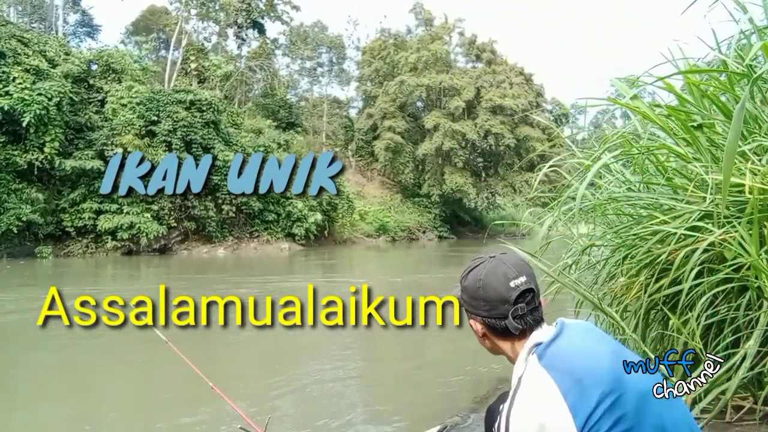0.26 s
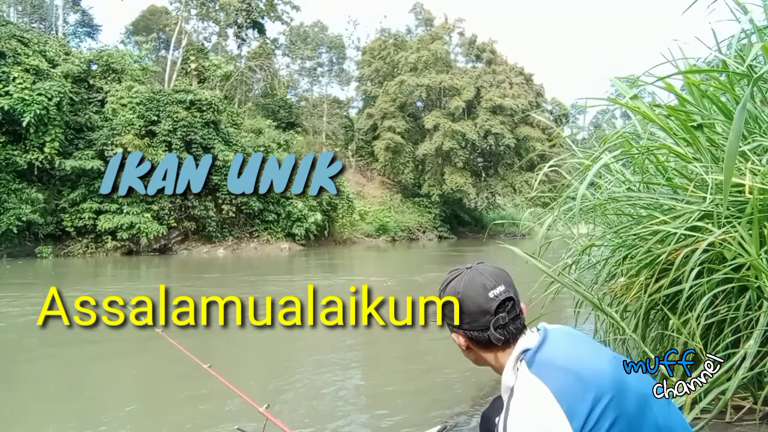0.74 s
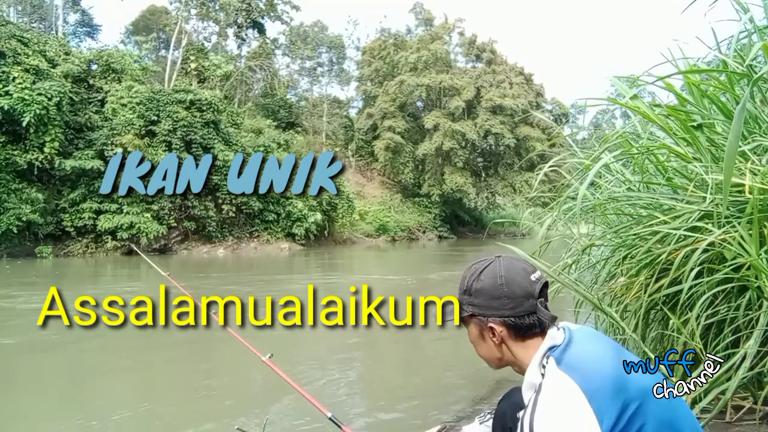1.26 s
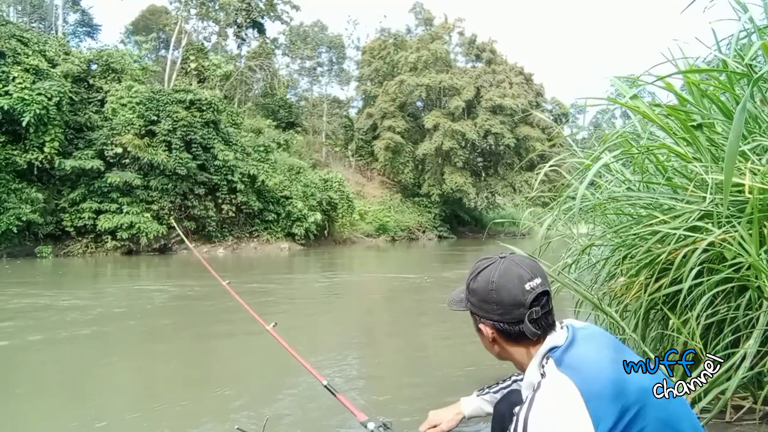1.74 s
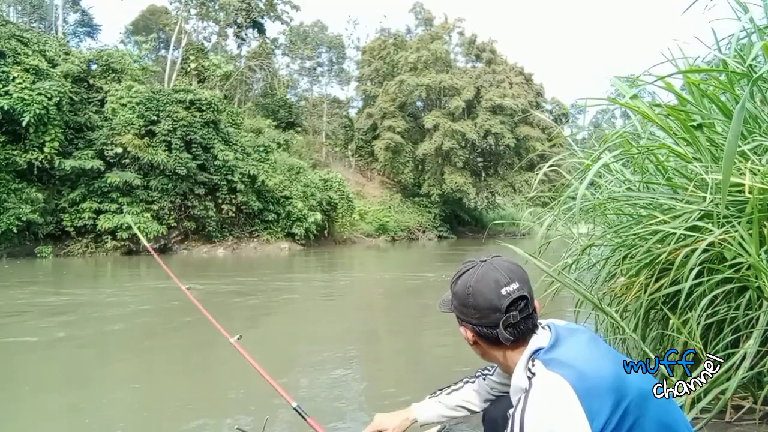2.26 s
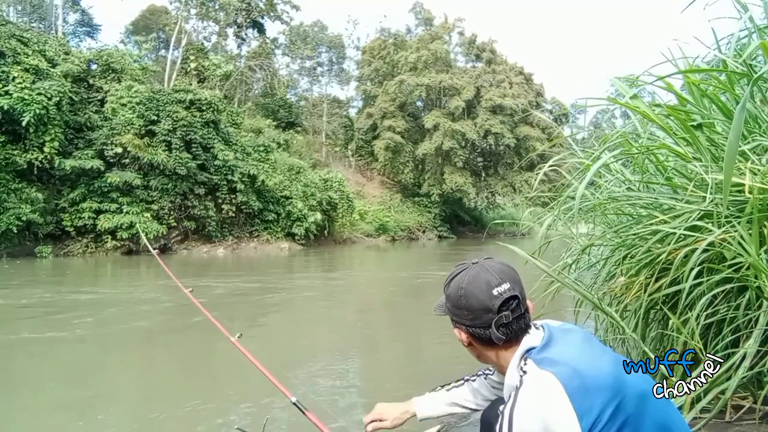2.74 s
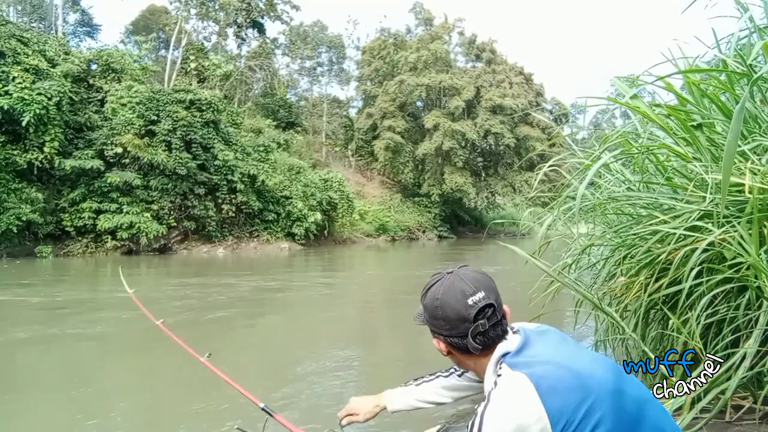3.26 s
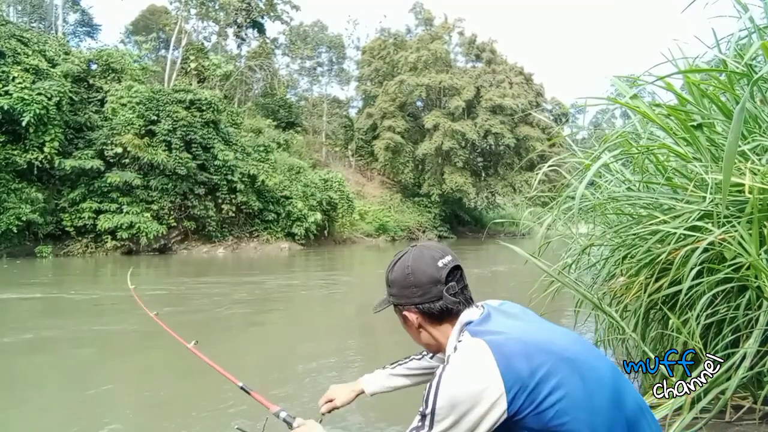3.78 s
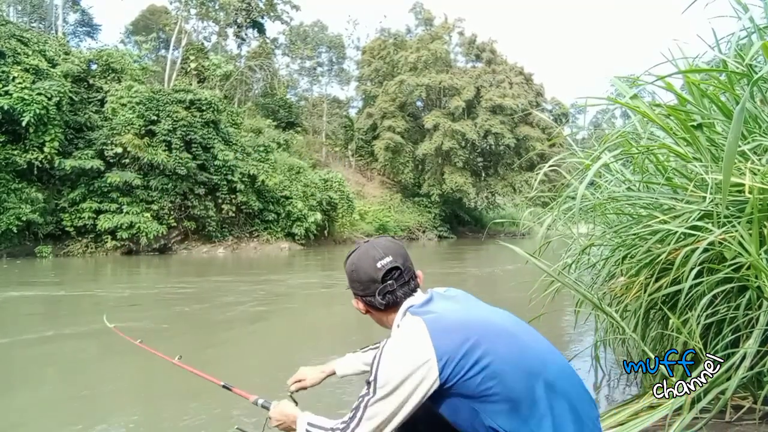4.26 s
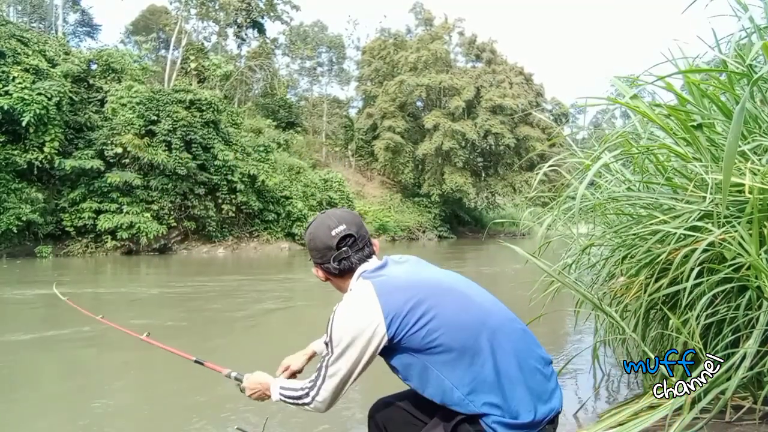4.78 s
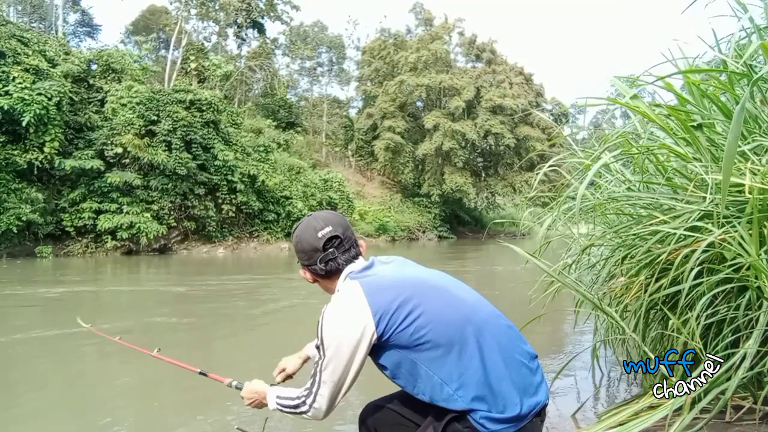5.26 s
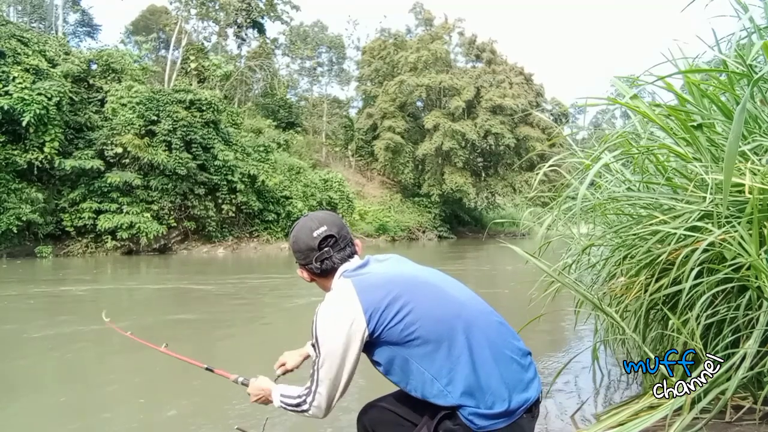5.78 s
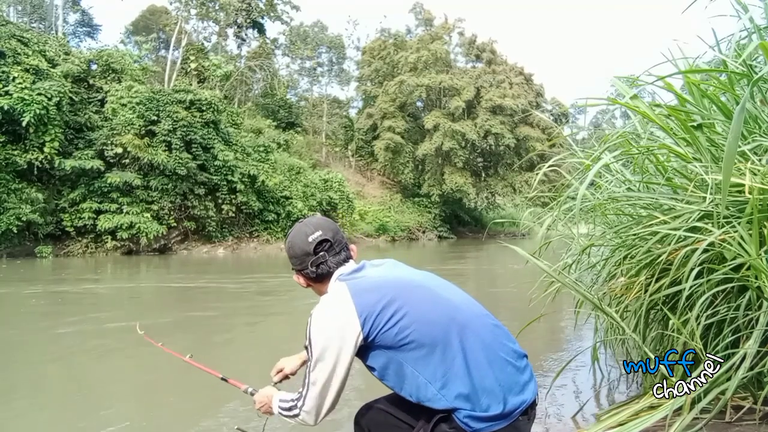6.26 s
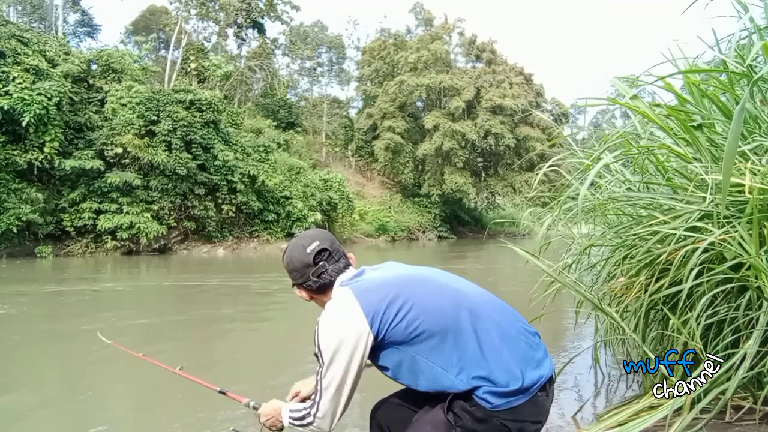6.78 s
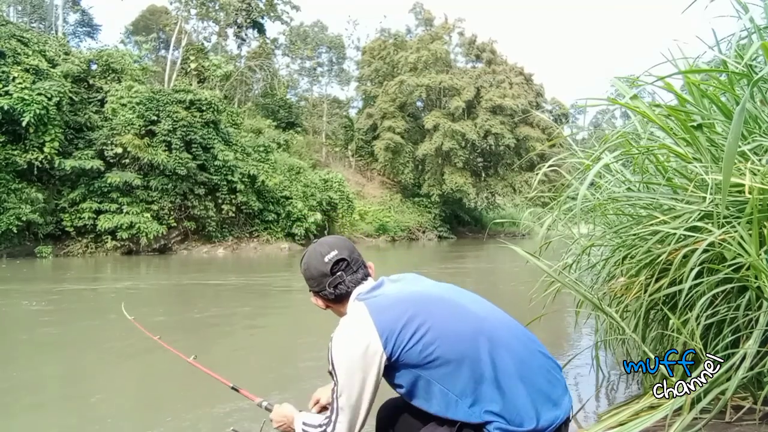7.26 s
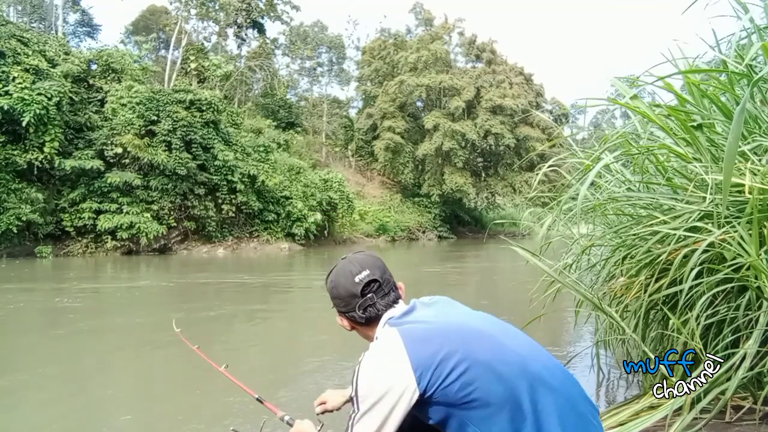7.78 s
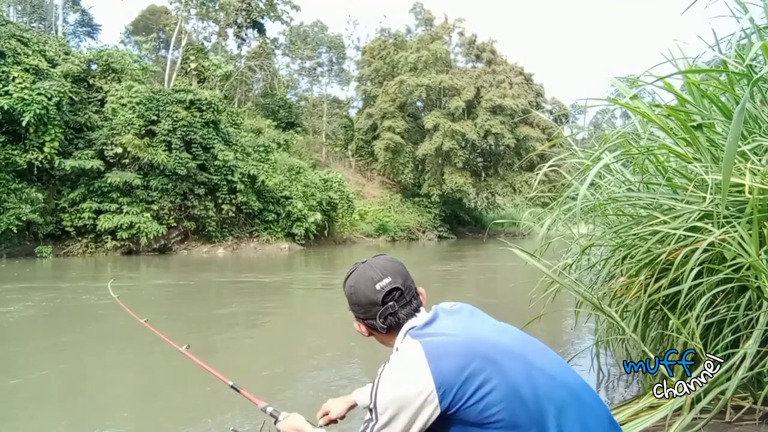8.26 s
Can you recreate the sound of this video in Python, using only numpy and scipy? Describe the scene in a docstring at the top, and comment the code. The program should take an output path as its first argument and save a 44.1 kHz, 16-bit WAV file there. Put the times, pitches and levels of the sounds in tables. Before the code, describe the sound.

Line is dragged off a clicking reel in a buzzing, surging run, squeaking now and then, against quiet river water and a high insect chorus.

```python
"""Close to the microphone on a riverbank, a fish pulls line off a reel: a noise tick for each ratchet tooth,
surging as the spool turns, with a line hiss, stick-slip squeaks, resonant rod hum and brief hollow tones.
Behind it: coloured noise for the river and far cicadas, narrow noise for whistling insects and brief breathy
tones (far whistles and short rings of the reel housing), low noise for wind on the microphone,
and short sine chirps for two crickets."""
import sys
import numpy as np
from scipy import signal
from scipy.fft import rfft, irfft, next_fast_len
from scipy.io import wavfile
from scipy.ndimage import uniform_filter1d

SR = 44100
rng = np.random.default_rng(int(sys.argv[2]) if len(sys.argv) > 2 else 0)


def transcribe(signal):
    """Save signal, clipped to [-1, 1], as a 16-bit WAV file at the path in sys.argv[1]."""
    frames = np.atleast_2d(signal).T
    limited = np.clip(frames, -1, 1)
    pcm = np.round(limited * 32767).astype(np.int16)
    wavfile.write(sys.argv[1], SR, pcm)


N = 376173  # length in samples


def gain_of(db):
    """Amplitude factor of a level in dB."""
    return 10 ** (np.asarray(db) / 20)


def evened(x):
    """Scale to rms 1."""
    return x / np.sqrt(np.mean(x ** 2) + 1e-20)


def read(points, hz):
    """Read a (freq_hz, value) curve on a logarithmic frequency axis."""
    f, value = np.transpose(points)
    return np.interp(np.log(hz + 1), np.log(f + 1), value)


def along(rows):
    """Read a (time_s, value) curve at every sample."""
    return np.interp(np.arange(N) / SR, *np.transpose(rows))


def gain_during(tables):
    """Gain that follows each (time_s, level_db) table and is practically zero outside them."""
    t = np.arange(N) / SR
    return np.max([gain_of(np.interp(t, *np.transpose(rows), left=-200, right=-200)) for rows in tables], axis=0)


def add(mix, s, sound):
    """Lay a sound into the mix at s seconds, cutting what falls outside."""
    start = round(s * SR)
    part = mix[max(start, 0):max(start + len(sound), 0)]
    part += sound[max(-start, 0):][:len(part)]


def drift(per_s):
    """Random wander of rms 1: sixteen sines at rates up to per_s."""
    f = np.geomspace(per_s / 8, per_s, num=16)
    t = np.arange(0, N + 64, 64) / SR
    wave = np.sin(2 * np.pi * (np.outer(t, f) + rng.random(16))).sum(axis=1)
    return np.interp(np.arange(N), np.arange(len(t)) * 64, evened(wave))


def resonate(x, hz, width):
    """Resonance on a moving pitch: shift hz down to zero, smooth twice, shift back."""
    turn = np.exp(2j * np.pi * np.cumsum(hz * np.ones(len(x))) / SR)
    r = np.exp(-np.pi * width / SR)
    return 2 * (turn * signal.lfilter([(1 - r) ** 2], [1, -2 * r, r * r], x / turn)).real


def noise(spectrum):
    """Steady noise of a given colour, rms 1."""
    count = next_fast_len(N)
    colour = gain_of(read(spectrum, np.fft.rfftfreq(count, 1 / SR)))
    return evened(irfft(rfft(rng.standard_normal(count)) * colour, count)[:N])


def patchy(x, patchy_db, size):
    """Louder and softer patches across the short-time spectrum; size is (bins, frames)."""
    z = signal.stft(x, nperseg=1024, noverlap=768)[2]
    patches = rng.standard_normal(z.shape[::-1]).T
    patches = evened(uniform_filter1d(uniform_filter1d(patches, size[0], axis=0), size[1], axis=1))
    patched = z * gain_of(patchy_db * np.clip(patches, -3, 1.9))
    return signal.istft(patched, nperseg=1024, noverlap=768)[1][:N]


def patch_depth(points):
    """Patch depth in dB for each short-time frequency bin."""
    return read(points, np.fft.rfftfreq(1024, 1 / SR))[:, None]


def flickering(modes, flicker_db, per_s, waver):
    """Narrow noisy tones, each wavering in pitch and swelling and fading by itself within bounds."""
    total = np.zeros(N)
    for hz, width, db in modes:
        tone = evened(resonate(rng.standard_normal(N), hz * (1 + waver * drift(per_s / 2)), width))
        total += gain_of(db + flicker_db * np.tanh(drift(per_s))) * tone
    return evened(total)


def glides(rows, blur_hz):
    """Gliding tones blurred into narrow noise: white noise through a moving resonance."""
    out = np.zeros(N)
    for (s, length, first_hz, last_hz, db), air in zip(rows, rng.standard_normal((len(rows), SR // 4))):
        pitch = np.linspace(first_hz, last_hz, int(np.clip(length, .03, .24) * SR))
        tone = evened(resonate(air[:len(pitch)], pitch, blur_hz))
        add(out, s, gain_of(db) * signal.windows.tukey(len(pitch), .6) * tone)
    return out


def foliage(x, wet_db, t60):
    """Leaves and banks scatter a short diffuse tail, t60 seconds long."""
    t = np.arange(SR // 4) / SR
    tail = rng.standard_normal(len(t)) * gain_of(-60 * t / t60) * (t > .004)
    return x + gain_of(wet_db) * signal.oaconvolve(x, tail / np.linalg.norm(tail))[:N]


# colour of the river's wash: freq_hz, density_db [dB per Hz]
RIVER_COLOUR = [(24, -40), (50, -16), (172, -2), (465, -3.5), (714, -7), (1100, -1.5), (1210, -1.5),
                (1360, 1.5), (1640, -2.5), (1850, -7.5), (2170, -13), (3390, -23.5), (4200, -23),
                (5460, -42), (9240, -120)]
# level of the wash: time_s, level_db
RIVER_LEVEL = [(0, -51), (.4, -49), (.65, -50.5), (2.2, -49.5), (2.8, -46), (3.3, -48.5), (4.2, -47.5),
               (6.5, -46), (8.53, -48)]
# how clumped the river is: freq_hz, patch_depth_db
RIVER_GURGLE = [(500, 2.5), (1300, 4.5)]


def river():
    """Moving water: coloured noise broken into gurgling patches."""
    return gain_of(along(RIVER_LEVEL)) * evened(patchy(noise(RIVER_COLOUR), patch_depth(RIVER_GURGLE), size=(4, 12)))


# far cicada chorus, dull from distance: freq_hz, density_db [dB per Hz]
CHORUS_COLOUR = [(4200, -33), (5000, -43), (6150, -8.5), (6500, -1), (7000, 1.5), (7400, -1.5),
                 (8100, -16.5), (10300, -17.5), (10800, -42), (13200, -35), (14300, -26), (15600, -29)]
# its swell: time_s, level_db
CHORUS_SWELL = [(0, -47.5), (1, -47.5), (2.2, -46), (3, -43.5), (5, -42), (8.5, -43.5)]


def cicada_chorus():
    """Many far cicadas blur to a streaky, throbbing hiss with a grainy buzz."""
    buzz = gain_of(0.65 * evened(uniform_filter1d(rng.standard_normal(N), size=150)))
    throb_hz = 17.6 + 1.4 * drift(2.0)
    throb = gain_of(0.63 * np.sin(2 * np.pi * np.cumsum(throb_hz) / SR))
    hiss = evened(patchy(noise(CHORUS_COLOUR), patchy_db=2.2, size=(4, 24)))
    return gain_of(along(CHORUS_SWELL)) * buzz * throb * hiss


# a lower cicada: freq_hz, density_db [dB per Hz]
DRONE_COLOUR = [(4300, -31.5), (4750, -7), (5150, 2.5), (5450, 3), (5800, 1), (6200, -36), (10600, -25),
                (11500, -22), (12300, -44)]
# its swelling and fading: time_s, level_db
DRONE_LEVEL = [(0, -55), (.15, -63), (.3, -59), (.49, -47), (.56, -52), (.78, -64), (.86, -58),
               (1.05, -49.5), (1.22, -53), (1.36, -65), (1.5, -50), (1.9, -59), (2.2, -53), (3, -53.5),
               (5.3, -45), (7, -46), (8.5, -46)]


def low_cicada():
    """A lower cicada swells and fades: a band of patchy noise."""
    return gain_of(along(DRONE_LEVEL)) * evened(patchy(noise(DRONE_COLOUR), patchy_db=3.5, size=(3, 14)))


RASP_HZ, RASP_WIDTH_HZ = 3186, 89
# a rougher insect among the lower whistlers: time_s, level_db
RASP_LEVEL = [(2.4, -66), (2.95, -51), (4.2, -63), (5.3, -52.5), (6.4, -55.5), (6.55, -50), (7.08, -48.5),
              (7.15, -63), (7.35, -49.5), (7.55, -55), (7.8, -49), (8.1, -50.5), (8.55, -57)]


def rasping_insect():
    """A rough insect: one narrow band of noise, flickering fast."""
    rasp = flickering([(RASP_HZ, RASP_WIDTH_HZ, 0)], flicker_db=4.5, per_s=13.0, waver=0.015)
    return gain_during([RASP_LEVEL]) * rasp


# thin whistling insects that come and go: pitch_hz, width_hz, relative_level_db
WHISTLER_TONES = [(2900, 70, -9), (3400, 500, -2), (3620, 120, -4), (3876, 75, -7), (4554, 350, -3),
                  (5195, 84, 0)]
# level of them together: time_s, level_db
WHISTLER_LEVEL = [(0, -65), (.3, -57), (.5, -64), (.9, -58), (1.2, -62), (2.2, -59.5), (2.8, -45),
                  (4.2, -47.5), (5, -43.5), (7.05, -42), (7.2, -47.5), (7.9, -44.5), (8.5, -45.5)]


def whistlers():
    """Single insects stand out as thin, wavering bands of noise."""
    return gain_of(along(WHISTLER_LEVEL)) * flickering(WHISTLER_TONES, flicker_db=5., per_s=9., waver=0.0088)


# far whistles and short rings of the reel housing: start_s, length_s, first_hz, last_hz, level_db
BREATHY_TONES = [(0.258, 0.11, 3550, 3720, -56), (0.554, 0.11, 3400, 3470, -61),
                 (0.628, 0.16, 3660, 3670, -61), (0.82, 0.22, 3840, 3870, -55.5),
                 (1.276, 0.18, 3780, 3560, -61.5), (1.52, 0.082, 3380, 3500, -56),
                 (1.565, 0.12, 2645, 2760, -55), (1.747, 0.046, 2560, 2700, -58),
                 (1.945, 0.2, 3640, 4040, -58), (2.082, 0.19, 3710, 3830, -58),
                 (1.79, .04, 3080, 3180, -60)]


def breathy_tones():
    """Brief breathy tones: far whistles and short rings of the reel housing, as gliding narrow noise."""
    return glides(BREATHY_TONES, blur_hz=95.)


# phrases [first_chirp_s, last_chirp_s], then pitch_hz, fall_hz within a chirp, chirps_per_s
LOW_CRICKET_SONG = [(-.005, .171), (.445, .966), (1.246, 1.475), (1.704, 2.106), (2.33, 2.679),
                    (2.784, 2.952), (3.302, 3.764), (4.211, 4.66), (5.0, 5.462), (5.63, 6.494),
                    (6.655, 7.805), (7.966, 8.484)], 7410, 420, 17.3
# the same columns for the higher cricket
HIGH_CRICKET_SONG = [(.187, .662), (.888, 1.424), (1.662, 2.075), (2.37, 2.78), (3.137, 3.485),
                     (3.912, 4.32), (4.792, 5.207), (5.44, 5.914), (6.27, 6.62), (6.916, 7.395),
                     (7.624, 7.74), (8.035, 8.511)], 7770, 20, 17
LOW_CRICKET_DB, HIGH_CRICKET_DB = -43.3, -47


def cricket(phrases, hz, fall_hz, per_s, db, length=.037):
    """Evenly spaced wing strokes; the pitch sags as each stroke ends."""
    out, u = np.zeros(N), np.linspace(0, 1, int(length * SR))
    for first, last in phrases:
        times = np.linspace(first, last, round((last - first) * per_s) + 1)
        for s, (shift, size) in zip(times, rng.standard_normal((len(times), 2))):
            phase = 2 * np.pi * np.cumsum(hz + 12 * shift - fall_hz * u ** 5) / SR
            chirp = signal.windows.tukey(len(u), .45) * np.sin(phase)
            add(out, s - length / 2, gain_of(db + .6 * size) * chirp)
    return out


def crickets():
    """Two crickets, each with its own pitch and pace, among scattering leaves."""
    pair = cricket(*LOW_CRICKET_SONG, LOW_CRICKET_DB) + cricket(*HIGH_CRICKET_SONG, HIGH_CRICKET_DB)
    return foliage(pair, wet_db=-14, t60=.08)


GUST_HZ, GUST_RISE_HZ_PER_S = 129, 110  # the buffeting climbs through a gust
GUST_EDGE_S = 0.049  # a gust dies twice as slowly as it rises
# wind on the microphone: start_s, length_s, level_db
WIND_GUSTS = [(1.7, 0.095, -41.5), (4.01, 0.35, -43)]


def wind():
    """Wind on the microphone: lumpy low buffeting, noise through a rising resonance."""
    out = np.zeros(N)
    for (s, length, db), air in zip(WIND_GUSTS, rng.standard_normal((len(WIND_GUSTS), SR // 2))):
        t = np.arange(int(length * SR)) / SR
        hz = GUST_HZ + GUST_RISE_HZ_PER_S * t
        lumps = resonate(resonate(air[:len(t)], hz, 93.0), hz, 93.0)
        edges = np.clip(np.minimum(t, (length - t) / 2) / GUST_EDGE_S, 0, 1)
        add(out, s, gain_of(db) * edges * evened(lumps))
    return out


BIND_S, SECOND_S = 0.023, .03  # spread of the two binds
# the spool binds as each turn begins and again part of the way round:
# start_s, bind_db, second_bind [share of the turn], second_bind_db
SPOOL_TURNS = [(1.45, -1, 0.72, 0.5), (1.72, -5, .5, 0.5), (2.29, -4, 0.56, -3.5), (2.527, -8, 0.51, -4),
               (2.759, -5, 0.5, -6.5), (2.991, -8, 0.51, -8), (3.222, -8, 0.43, -8.5),
               (3.508, -6, 0.45, -7), (3.73, -9, 0.57, -3), (4.028, -7, 0.47, -5.5), (4.311, -8, 0.55, -5),
               (4.601, -10.5, 0.49, -4), (4.892, -10.5, 0.53, -6), (5.179, -8, 0.48, -5.5),
               (5.44, -5, 0.44, -6), (5.73, -10.5, 0.51, -3.5), (6.009, -9.5, 0.52, -6),
               (6.29, -4.5, 0.53, -6.5), (6.58, -7, 0.46, -5.5), (6.869, -8, 0.7, -5.5),
               (7.14, -13, 0.47, -4.5), (7.451, -9.5, 0.5, -4.5), (7.76, -7.5, 0.59, -4.5),
               (8.032, -8, 0.46, -3), (8.319, -11, 0.28, -5), (8.6, -4, .5, 0)]


def spool():
    """Turns of the spool so far, and the binding in dB as bell-shaped changes twice a turn."""
    start, bind_db, share, second_db = np.transpose(SPOOL_TURNS)
    t = np.arange(0, N + 64, 64) / SR
    second = start[:-1] + share[:-1] * np.diff(start)
    dips = np.exp(-.5 * ((t[:, None] - start) / BIND_S) ** 2) @ bind_db
    dips = dips + np.exp(-.5 * ((t[:, None] - second) / SECOND_S) ** 2) @ second_db[:-1]
    now = np.arange(N) / SR
    return np.interp(now, start, np.arange(len(start))), np.interp(now, t, dips)


HUM_SWING_DB, HUM_PEAK = 4.5, 0.78  # swells once a turn, loudest at this share of it
# resonances of the rod: freq_hz, width_hz, relative_level_db
ROD_MODES = [(524, 86, 0.5), (1077, 170, 7), (1175, 38, 3.5), (1467, 380, 8), (1650, 52, 5), (2285, 100, 2)]
# mean hum while line runs: time_s, level_db
HUM_LEVEL = [(1.65, -72), (1.78, -48), (1.9, -71), (2.2, -84), (2.45, -50), (2.9, -48.5), (3.5, -53),
             (3.9, -52), (4.3, -51.5), (4.4, -64), (4.8, -57.5), (5.45, -51), (6.15, -62), (6.47, -50.5),
             (7.1, -64.5), (8.2, -52), (8.35, -60), (8.55, -52)]


def rod_hum():
    """The rod hums while line runs: noisy resonances that flicker and swell with each spool turn."""
    hum = flickering(ROD_MODES, flicker_db=8., per_s=9., waver=.02)
    swing = gain_of(HUM_SWING_DB * np.cos(2 * np.pi * (spool()[0] - HUM_PEAK)))
    return gain_during([HUM_LEVEL]) * swing * hum


# brief hollow tones: start_s, length_s, first_hz, last_hz, level_db
HOLLOW_TONES = [(2.43, 0.066, 1510, 1510, -45), (2.68, 0.069, 1560, 1540, -44),
                (2.69, 0.057, 1088, 1130, -44), (2.86, 0.1, 1120, 1224, -43.5),
                (2.91, 0.059, 1570, 1580, -45.5), (3.26, 0.082, 1392, 1233, -42),
                (3.48, 0.15, 1140, 1200, -45), (3.79, 0.072, 1459, 1470, -45),
                (3.86, 0.049, 1097, 1045, -42.5), (4.06, 0.062, 1095, 1110, -46.5),
                (4.22, 0.046, 1070, 1027, -46.5), (4.3, 0.0404, 1050, 1040, -45.5),
                (4.81, 0.046, 1120, 1058, -44.5), (4.97, 0.034, 1080, 1112, -45),
                (5.08, 0.073, 1670, 1730, -46.5), (5.22, 0.055, 2220, 2390, -46),
                (6.45, 0.12, 1170, 1138, -48)]


def hoots():
    """Brief hollow tones, level or gliding, stand out of the hum."""
    return glides(HOLLOW_TONES, blur_hz=60.4)


# the drag washer squeaks: start_s, peak_db, pitch_hz, glide_hz, length_s
DRAG_SQUEAKS = [(1.75, -38, 6400, -200, 0.016), (2.613, -17.5, 7070, -100, 0.0061),
                (2.677, -25, 6840, -500, 0.029), (2.836, -28.5, 7500, -200, 0.01),
                (3.274, -23, 7010, 300, 0.019), (3.415, -21.5, 6780, -150, 0.02),
                (3.522, -23.5, 7630, -900, 0.034), (3.839, -21.5, 7000, -200, 0.012),
                (4.13, -30, 6500, -200, 0.01), (4.226, -29, 6390, -200, 0.022),
                (4.364, -32.5, 7600, -400, 0.012), (4.653, -31.5, 7260, -200, 0.013),
                (5.225, -26.5, 6500, -100, 0.011), (5.485, -28, 6890, -200, 0.014),
                (6.255, -22.5, 6840, 202, 0.013), (6.361, -31.5, 6950, -200, 0.028),
                (6.624, -29.5, 6380, -300, 0.01), (6.992, -34, 7380, -200, 0.015),
                (7.87, -33, 7160, -600, 0.023)]


def squeaks():
    """The drag washer sticks and slips: short rough whistles with a faint octave."""
    out = np.zeros(N)
    roughness = rng.standard_normal((len(DRAG_SQUEAKS), 2000))
    for (s, db, hz, glide_hz, length), rough in zip(DRAG_SQUEAKS, roughness):
        u = np.linspace(0, 1, int(np.clip(length, .006, .04) * SR))
        wobble = evened(uniform_filter1d(rough, size=40))[:len(u)]
        phase = 2 * np.pi * np.cumsum(hz + glide_hz * (u - .5) + 150 * wobble) / SR
        whistle = np.sin(phase) + 0.12 * np.sin(2 * phase)
        add(out, s - .002, gain_of(db) * signal.windows.tukey(len(u), .25) * whistle)
    return out


# colour of one click through the reel housing: freq_hz, level_db
HOUSING_COLOUR = [(1800, -42.5), (2500, -9), (3100, -2.5), (3500, -5.5), (4150, -4.5), (4850, 1),
                  (5500, 8.5), (6100, 5), (7000, 5.5), (8300, -4), (10000, -4), (12200, -4), (14300, 5),
                  (15000, 1.5), (15700, 5.5)]


def through_housing(x):
    """The housing colours each click at once: a minimum-phase filter of unit energy."""
    log_gain = np.log(gain_of(read(HOUSING_COLOUR, np.fft.rfftfreq(4096, 1 / SR))))
    log_gain = np.r_[log_gain, log_gain[-2:0:-1]]
    body = np.fft.ifft(np.exp(log_gain - 1j * signal.hilbert(log_gain).imag)).real[:1024]
    return signal.oaconvolve(x, body / np.linalg.norm(body))[:N]


# one table for each pull on the line: time_s, ratchet_level_db before the binding
LINE_PULLS = [
    [(1.45, -79), (1.48, -47.5), (1.62, -36.5), (1.82, -40.5), (1.88, -58)],
    [(2.215, -75), (2.232, -39.5), (2.38, -30.5), (3.0, -29.5), (3.6, -31.5), (4.1, -35), (4.6, -37),
     (5.4, -35), (6.5, -35), (7.3, -37), (8.2, -37.5), (8.55, -38)],
]
# mean spool speed: time_s, clicks_per_s
SPOOL_SPEED = [(1.45, 72), (1.62, 103), (1.85, 49), (2.22, 73), (2.45, 122), (3.0, 143), (3.45, 127),
               (4.0, 112), (4.8, 104), (5.8, 103), (6.5, 124), (7.5, 110), (8.5, 104)]


def ratchet(surge=.06, rattle=0.089, soften=0.7, ring_s=0.0063, rise_s=0.00089, fall_s=.0011):
    """The pawl snaps over each tooth: a sharp tick, a short rattle; slower and softer where the spool binds."""
    bind_db = spool()[1]
    softening = gain_of(soften * bind_db)
    clicks_per_s = along(SPOOL_SPEED) * np.exp(surge * (bind_db - bind_db.mean()) + 0.0391 * drift(40))
    tooth = (np.cumsum(clicks_per_s) / SR).astype(int)
    since = np.arange(N) - np.searchsorted(tooth, tooth)  # samples since the last tooth
    force = gain_of(1.3 * rng.standard_normal(N)[tooth])
    rise = (1 - np.exp(-since / (rise_s * SR))) ** 2
    fall = 2 * np.exp(-since / (fall_s * SR)) + 0.2 * np.exp(-since / (ring_s * SR))
    # a faint rattle lies under the ticks and sinks where the spool binds
    ticks = rng.standard_normal(N) * (force * rise * fall + rattle * softening)
    return through_housing(gain_during(LINE_PULLS) * softening * evened(ticks))


LINE_HZ, LINE_WIDTH_HZ, LINE_DB = 14700, 960, -17  # level relative to the pulls


def line_hiss():
    """Line hisses off the spool: a high band of noise that follows the pulls."""
    hiss = evened(resonate(rng.standard_normal(N), LINE_HZ, LINE_WIDTH_HZ))
    return gain_during(LINE_PULLS) * gain_of(LINE_DB) * hiss


# how far the reel's colour shifts: freq_hz, patch_depth_db
REEL_SHIFTING = [(2000, 5.5), (4500, 4), (8000, 2.2), (15000, 1.5)]


def reel():
    """Close by, the reel turns in the hand, so its colour keeps shifting; the bank scatters a tail."""
    running = patchy(ratchet() + line_hiss(), patch_depth(REEL_SHIFTING), size=(5, 10))
    return foliage(running + squeaks(), wet_db=-9.0, t60=0.058)


def scene():
    """The riverbank from its background to the close reel, in one channel."""
    insects = cicada_chorus() + low_cicada() + rasping_insect() + whistlers() + crickets()
    bank = river() + insects + breathy_tones() + wind()
    return (bank + rod_hum() + hoots() + reel())[None]


EDGE_HZ = 15650  # upper band limit


def record(dry):
    """A small microphone drops the deep bass; then the band limit."""
    thin = signal.sosfilt(signal.butter(2, 62., "high", fs=SR, output="sos"), dry)
    return signal.oaconvolve(thin, signal.firwin(511, EDGE_HZ, window=("kaiser", 9), fs=SR)[None], "same")


dry = scene()
out = record(dry)
transcribe(out)
```